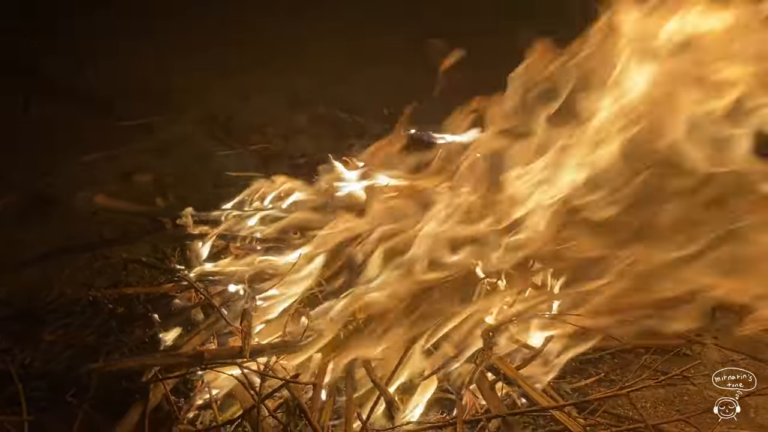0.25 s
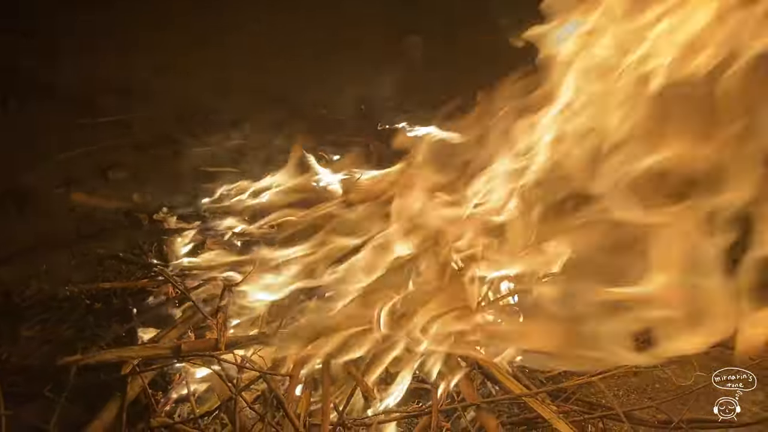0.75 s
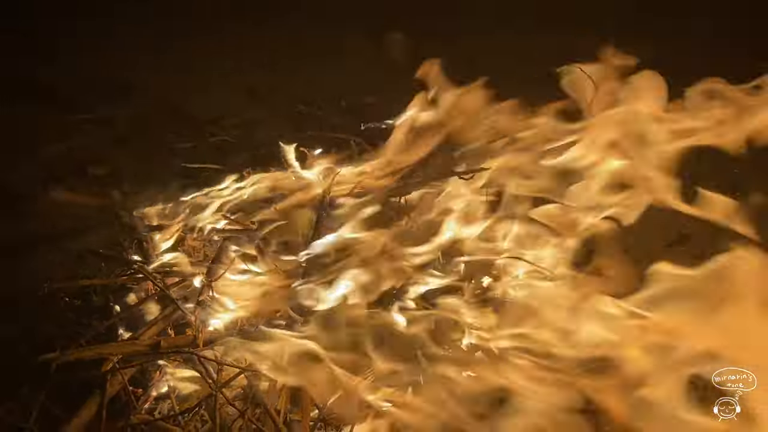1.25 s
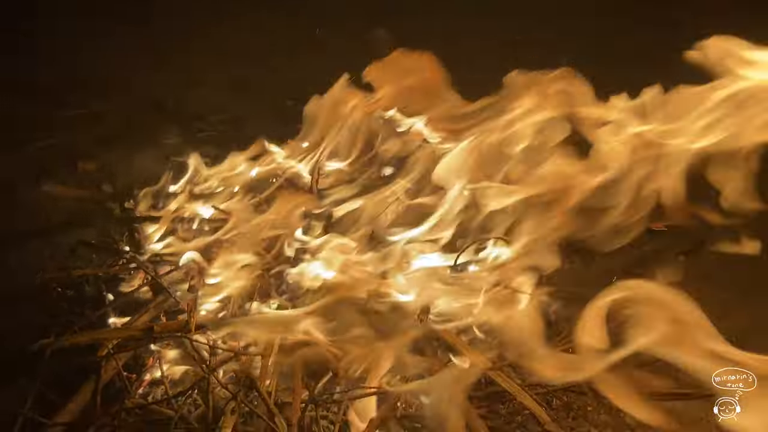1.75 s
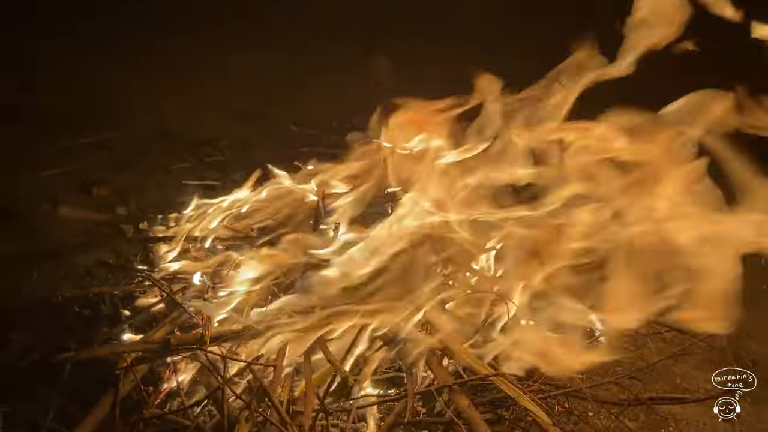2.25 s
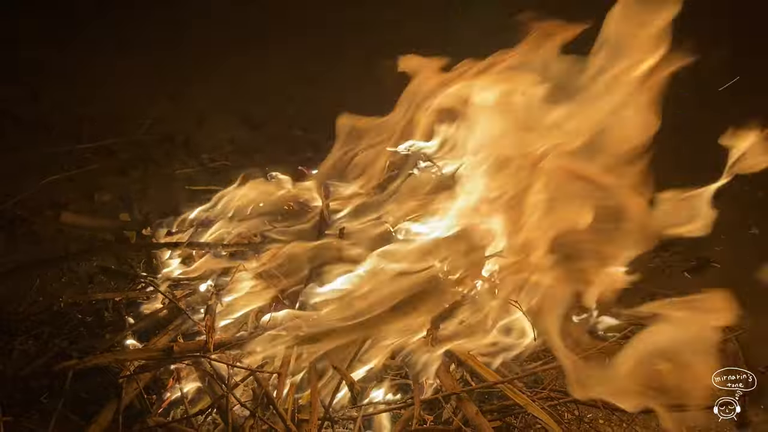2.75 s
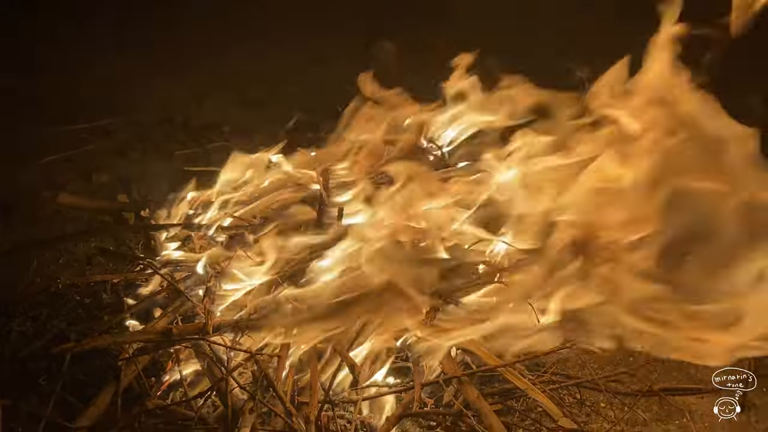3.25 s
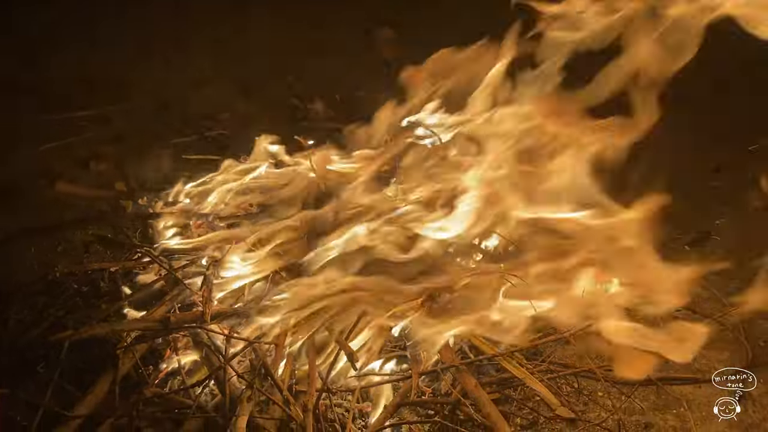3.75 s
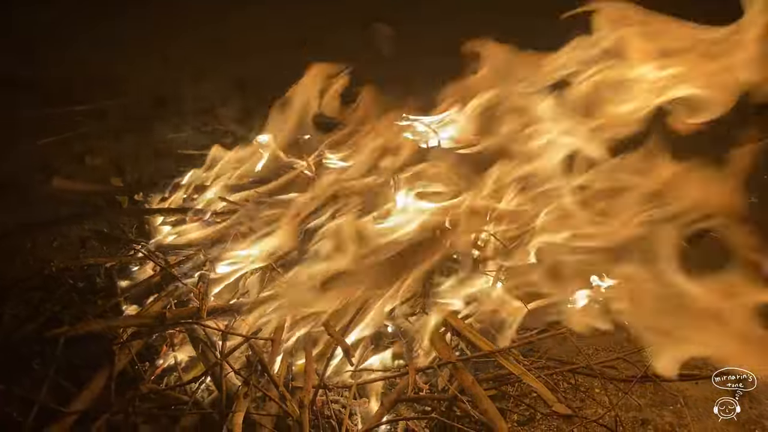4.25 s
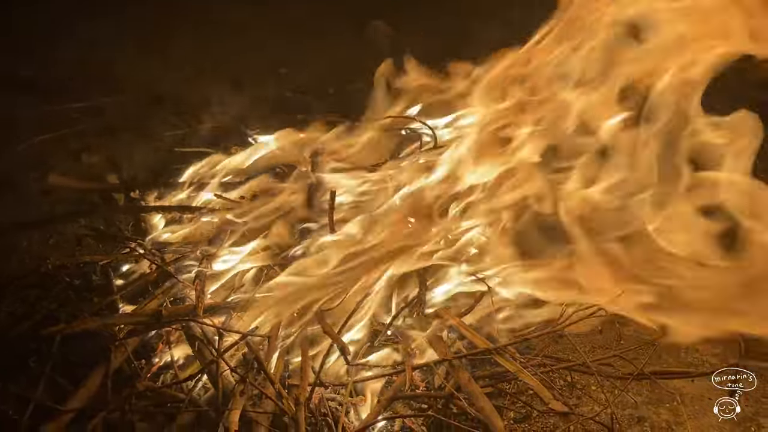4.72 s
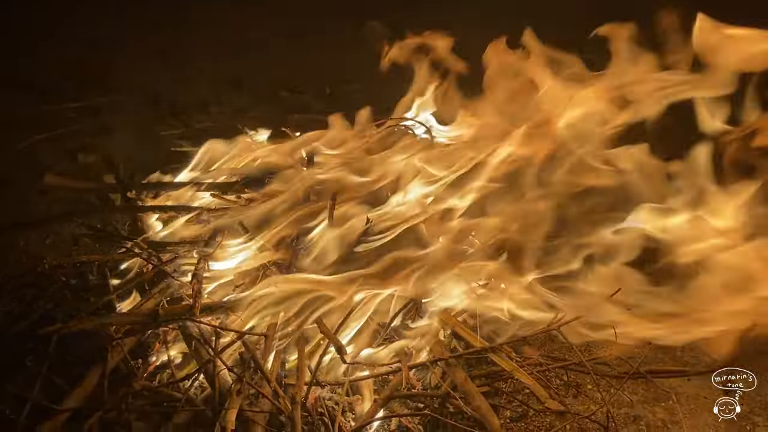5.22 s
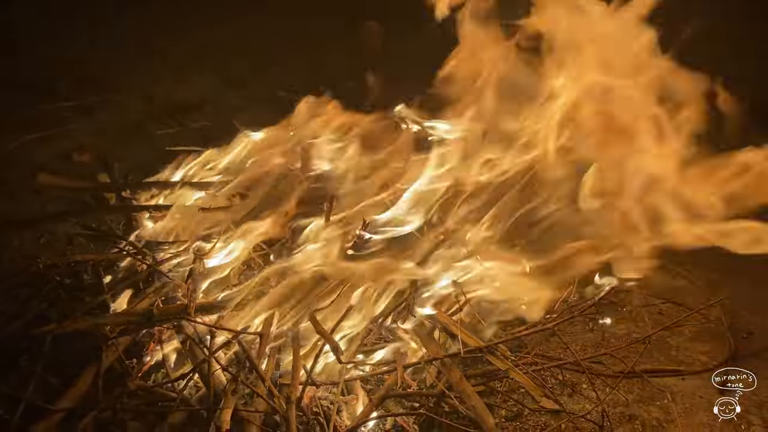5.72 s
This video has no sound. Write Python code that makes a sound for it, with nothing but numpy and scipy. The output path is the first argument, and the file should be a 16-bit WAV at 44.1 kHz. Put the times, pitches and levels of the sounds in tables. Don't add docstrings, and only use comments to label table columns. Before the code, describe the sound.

A heap of burning twigs, heard from a few metres away in open air. Crisp dry snaps crowd the first three seconds, the hardest at 0.3 and 1.8; a big pop at 3.7 blows out a short puff of gas. Wind flutters the flames in deep soft thuds, strongest just after 5 seconds, over steady airy hiss with wide treble.

```python
import sys
import numpy as np
from scipy import signal
from scipy.fft import rfft, irfft
from scipy.io import wavfile
from scipy.ndimage import uniform_filter1d

SR = 44100
rng = np.random.default_rng(int(sys.argv[2]) if len(sys.argv) > 2 else 0)


def amplitude_ratio(level_db):
    exponent = np.asarray(level_db, float) / 20
    return 10 ** exponent


def bounce(signal):
    frames = np.transpose(np.atleast_2d(signal))
    limited = np.clip(frames, -1, 1)
    pcm = np.round(limited * 32767).astype(np.int16)
    wavfile.write(sys.argv[1], SR, pcm)


N = 263718

# (frequency [Hz], level per Hz [dB])
FLAP_COLOUR = [(22, -19), (35, -17), (48, -4), (66, -3), (90, -6), (130, -15.5)]
ROAR_COLOUR = [(60, 1.5), (100, 0), (200, 0), (330, -4.5), (450, -14.5), (600, -26), (900, -27.5)]
DRONE_COLOUR = [(350, -11.5), (600, -7.5), (820, -3), (960, 0), (1150, -5.5), (1400, -8.5), (2200, -26.5)]
RUSH_COLOUR = [(400, -7), (800, 2), (1400, -4), (2200, -1), (3200, -3.5), (4500, -5.5), (6000, -3),
               (7500, -17)]
HISS_COLOUR = [(1500, -26), (3000, -9), (5000, -32), (6500, -3), (8500, 2.5), (12000, 3.5), (15800, 0),
               (16300, -49)]

# (time [s], peak level [dB], half length [s])
GUSTS = [(.36, -49.5, 0.16), (.75, -48.5, .09), (.99, -44.5, 0.049), (1.4, -45.5, 0.09), (1.7, -47, 0.075),
         (1.9, -48, .12), (2.11, -41.5, 0.05), (2.35, -47.5, 0.12), (2.65, -47, 0.16), (3.3, -55.5, .15),
         (3.53, -45, .035), (3.71, -43, 0.057), (3.83, -43, 0.042), (4.12, -53, 0.081), (4.38, -52, .06),
         (4.6, -46, 0.052), (4.77, -43, 0.048), (5.19, -38, 0.074), (5.35, -37.5, 0.021), (5.5, -45, 0.088),
         (5.63, -40.5, 0.032), (5.77, -50, 0.048), (5.92, -52.5, .1)]
CALM_DB = -56.5
# (time [s], level against the mean [dB])
DRAUGHT = [(0, -1.5), (.4, 1.5), (.53, -5.5), (.8, 2), (1.05, -2.5), (1.22, 4.5), (1.46, 0.5), (1.55, 4.5),
           (1.75, 1.5), (2.2, 1), (3.0, 0.5), (3.45, -1.5), (3.7, 1), (3.95, -2.5), (4.13, -1), (4.25, -2),
           (4.65, -1.5), (5.98, 0)]
ROAR_DB, HISS_DB = -47, -58
HISS_PER_DRAUGHT = 0.23

TYRES_S, TYRES_DB, RECEDE_S = 0.13, -59.5, 1.4
# (time [s], peak level [dB], half length [s])
SETTLES = [
    (1.72, -58.5, 0.14),
    (2.05, -63, .12),
    (.53, -58, 0.043),
    (2.16, -55.5, 0.043),
    (3.66, -62, 0.034),
    (4.55, -66.5, 0.13),
    (5.15, -68, 0.062),
    (5.8, -66, 0.52),
]

# (time [s], snap peak [dB], woody knock against snap [dB],
# crack against snap [dB], burst length [ms])
POPS = [(0.0307, -21.5, -36, -24, 0.37), (0.1702, -15.5, -13, -17, 0.17), (0.3431, -2, -17.5, -25, 0.39),
        (0.6703, -11.5, -16.5, -11, 1.4), (1.7108, -27, -34, -19, 0.48), (1.734, -24.5, -33, -23.5, 0.67),
        (1.7452, -28, -4, -1, 2.5), (1.7783, -0.5, -25, -17, 0.17), (1.7861, -22, -39, -13, 0.66),
        (1.875, -20, -13.5, -8.5, 0.54), (2.048, -19.5, -26, -27, 0.28), (2.5708, -27, -8, -2.5, 0.36),
        (2.6071, -20, -35, -26, 1.3), (2.6774, -18.5, -32, -23, 0.49), (2.7261, -10, -39, -17, 0.97),
        (3.549, -18, -29, -13.5, 0.38), (3.6677, -4, -10, -6, 1.47), (3.7886, -29, -41, -5.5, 2.1),
        (4.058, -27, -25, -4.5, 0.86), (4.725, -23, -23, -14, 0.37), (5.2514, -18, -19.5, -15, 0.31),
        (5.6483, -24, -16, -28, 0.38), (5.8987, -23, -18, -9.5, 0.8)]
# (time [s], level [dB])
JETS = [(.0306, -53), (.6705, -41), (1.7111, -46), (1.7787, -42.5), (2.048, -48), (2.6069, -47),
        (2.6773, -48), (3.5491, -57), (3.6674, -34), (5.2515, -49), (5.8985, -57)]
# (time [s], peak level [dB], burst length [ms])
SNAPS = [(.126, -29.5, .41), (.228, -28.5, .51), (.2522, -28, 0.45), (.33, -31, 0.95), (.4318, -34.5, 1.3),
         (.4688, -35, 0.92), (.5013, -34, 1.1), (.5287, -31, 0.54), (.7346, -28, .37), (1.2088, -38, 1.7),
         (1.2836, -35, 1.4), (1.3568, -31, .8), (1.4536, -34, 0.76), (1.5997, -28.5, .31),
         (1.848, -28.5, 1.3), (1.8819, -27, 0.81), (2.1992, -37, 0.43), (2.6349, -27.5, 0.54),
         (2.9552, -34, 2.9), (3.1529, -26.5, 0.59), (3.612, -31, .53), (3.95, -31, .33),
         (4.1072, -26.5, .3), (4.2757, -33, .9), (4.349, -30, .54), (5.5504, -34, .44), (5.7902, -24, 0.35),
         (5.864, -33, .44), (5.9708, -24, 0.41)]
# (time [s], peak level [dB])
FAINT_SNAPS = [(.061, -34), (.1782, -35), (.2053, -37), (.5475, -32), (.8186, -35), (.8412, -33), (1.1122, -38),
               (1.1476, -40), (1.2325, -36), (1.4295, -37), (1.5475, -34), (1.9201, -33), (1.979, -42),
               (2.167, -38), (2.5562, -38), (3.7495, -36), (3.8577, -37), (3.926, -39.5), (4.0705, -33),
               (4.0807, -37), (4.4984, -39), (4.6846, -39), (5.3344, -39.5), (5.3718, -38), (5.5611, -37),
               (5.6096, -36), (5.6311, -39), (5.8347, -37), (5.9567, -40)]
FAINT_SNAP_MS = 0.6
# (time [s], peak level [dB], burst length [ms])
CRACKS = [(.7125, -27, 1.1), (1.5042, -31, .55), (1.914, -25.5, 0.53), (2.0172, -30.5, 2.3),
          (2.2931, -29.5, 0.41), (2.5365, -33.5, 1.6), (2.8848, -29, 1.9), (3.2801, -37.5, 1.6),
          (3.4218, -34.5, 0.7), (4.1346, -31, .71), (4.1682, -32.5, 2), (4.5334, -26.5, 0.69),
          (4.5914, -34, .55), (4.8214, -28.5, 1.9), (4.9795, -33, .51), (4.9832, -29, .53),
          (5.35, -34, .71), (5.4529, -28.5, 0.33), (5.7959, -30, 0.44)]
# (time [s], peak level [dB], burst length [ms])
THUDS = [(.2573, -41, .41), (.4809, -32, 0.4), (1.6667, -33.5, 1.6), (2.1904, -27.5, 0.44),
         (2.1947, -25.5, 0.68), (2.3147, -33, 1.8), (2.6483, -34.5, .64), (2.6806, -33.5, 1.8),
         (2.8767, -32, 0.5), (3.6248, -32.5, .66), (4.7798, -38, 1.7), (4.8534, -40.5, 2.1),
         (5.265, -38, 2.1), (5.9765, -33, .38)]
SNAP_KNOCK_DB, SNAP_CRACK_DB = -37, -22
CRACK_KNOCK_DB, CRACK_CRACK_DB = -23, -13
THUD_KNOCK_DB, THUD_CRACK_DB = -9, -8

# (start [s], end [s], pitch [Hz], level [dB])
WHISTLES = [
    (.36, .5, 2945, -75),
    (.83, 1.04, 2945, -73),
    (1.06, 1.2, 2945, -81),
    (.36, .52, 5389, -78),
    (.83, .9, 5389, -77),
    (1.36, 1.56, 5389, -74),
    (1.56, 1.85, 5389, -77),
    (1.88, 1.97, 1640, -70),
    (2.11, 2.19, 1580, -67),
]
# (time [s], peak level [dB], ring [Hz], ring length [cycles])
KNOCKS = [
    (1.667, -47, 1070, 2.0),
    (1.715, -55, 891.4, 2.0),
    (2.133, -39, 1630, 2.8),
    (2.156, -48, 1013, 2.0),
    (2.172, -40, 1054, 1.4),
    (2.191, -32.5, 1020, 2),
    (5.038, -34, 1107, 1.431),
    (5.154, -34, 1103, 1.4),
]

# (frequency [Hz], phase lead [rad])
LEFT_LEAD = [(0, 0), (800, -.3), (1900, .4), (2800, 2.7), (3600, 3.8), (4500, 6.6), (5400, 8.9),
             (6600, 6.5), (17000, -7.6), (22050, -14.4)]


def level(x, db=0):
    return x * amplitude_ratio(db) / np.sqrt(np.mean(x ** 2, axis=-1, keepdims=True))


def band(x, lo_hz, hi_hz):
    sos = signal.butter(2, [lo_hz, min(hi_hz, 0.45 * SR)], "band", fs=SR, output="sos")
    y = signal.sosfilt(np.vstack([sos, sos]), x)
    return y / np.abs(y).max(axis=-1, keepdims=True)


def walk(rate):
    hold = int(SR / rate)
    steps = np.repeat(rng.standard_normal(N // hold + 1), hold)
    smooth = uniform_filter1d(uniform_filter1d(steps, hold), hold)
    return 1.06 * smooth[:N]


def pair(shape, alike):
    mid, side = rng.standard_normal((2,) + shape)
    alike = np.clip(alike, 0, 1)
    shared = mid * np.sqrt(1 + alike)
    apart = side * np.sqrt(1 - alike)
    return np.array([shared + apart, shared - apart])


def turbulence(colour, alike, flicker_db, rate, grain=1):
    hz = np.fft.rfftfreq(N, 1 / SR) + 1
    f, db = np.transpose(colour)
    colour_db = np.interp(np.log(hz), np.log(f), db, left=-90, right=-90)
    spectrum = rfft(pair((N,), alike) * grain) * amplitude_ratio(colour_db)
    out = 0
    for octave in np.arange(np.log2(f[0]), np.log2(f[-1]) + 0.5, 0.5):
        share = np.clip(1 - 2 * np.abs(np.log2(hz) - octave), 0, 1)
        out = out + irfft(spectrum * share, N) * amplitude_ratio(flicker_db * walk(rate))
    return level(out)


def steady(x, span_s):
    return x / np.sqrt(uniform_filter1d((x ** 2).mean(axis=0), int(span_s * SR)))


def swells(rows):
    t = np.arange(N) / SR
    return sum(amplitude_ratio(db) ** 2 * np.exp(-((t - s) / half) ** 2) for s, db, half in rows)


def add(out, times, sounds):
    for s, sound in zip(times, np.swapaxes(sounds, 0, 1)):
        i = int(s * SR)
        out[:, i:i + sound.shape[1]] += sound[:, :N - i]


def flame_flap():
    flap_db = 10 * np.log10(amplitude_ratio(CALM_DB) ** 2 + swells(GUSTS))
    noise = turbulence(FLAP_COLOUR, alike=0.83, flicker_db=5.5, rate=5.88)
    return amplitude_ratio(flap_db) * steady(noise, span_s=0.085)


def flame_roar(draught_db):
    roar_db = ROAR_DB + draught_db + 1.2 * walk(12) + 2.2 * walk(30)
    noise = turbulence(ROAR_COLOUR, alike=0.98812, flicker_db=2.0, rate=14)
    return amplitude_ratio(roar_db) * steady(noise, span_s=0.065)


def drone_and_rustle(drone_db):
    return amplitude_ratio(drone_db + 2.5) * turbulence(DRONE_COLOUR, alike=0.2, flicker_db=3.0, rate=8.2)


def sap_hiss(draught_db, drone_db):
    hiss_db = HISS_DB + HISS_PER_DRAUGHT * draught_db + 0.9 * walk(21)
    crackles = (rng.random(N) < 250 / SR) * amplitude_ratio(2.92 * rng.exponential(size=N))
    grain = 1 + 0.5 * signal.lfilter([1], [1, -np.exp(-1 / (0.00079 * SR))], crackles)
    rush_db = 0.28 * (drone_db + 67.5) + 0.5 * (hiss_db + 60) - 63.5
    rush = amplitude_ratio(rush_db) * turbulence(RUSH_COLOUR, alike=0.2, flicker_db=0.7, rate=25, grain=grain)
    hiss = amplitude_ratio(hiss_db + 2.5) * turbulence(HISS_COLOUR, alike=0.95, flicker_db=0.9, rate=35, grain=grain)
    return rush + hiss


def flames():
    t = np.arange(N) / SR
    draught_db = np.interp(t, *np.transpose(DRAUGHT))
    tyre_power = amplitude_ratio(TYRES_DB) ** 2 / (1 + ((t - TYRES_S) / RECEDE_S) ** 2)
    drone_db = 10 * np.log10(tyre_power + swells(SETTLES))
    fire = flame_flap() + flame_roar(draught_db)
    return fire + drone_and_rustle(drone_db) + sap_hiss(draught_db, drone_db)


def bursts(rows):
    snap_db, knock_db, crack_db, length_ms = rows.T[:, :, None]
    t = np.arange(600) / SR
    rasp = np.exp(-t / (np.maximum(length_ms, 0.1) * 0.00073))
    ground = amplitude_ratio(-25) * np.exp(-np.abs(t - 0.0016) / 0.00014)
    scatter = amplitude_ratio(-32.5) * np.exp(-t / 0.0022)
    echo = ground + scatter
    click = 2.3 * (t == 0)

    def push(alike):
        return pair(rasp.shape, alike) * (rasp + echo) + click

    snap = band(push(1.0), 7050, 15560)
    crack = band(push(0.13), 1670, 8030)
    knock = np.roll(band(push(0.64), 754, 2720), int(0.00033 * SR), axis=-1)
    thump = band(push(0.92), 146, 737)
    wood = knock + amplitude_ratio(-16.5) * thump
    return amplitude_ratio(snap_db) * (snap + amplitude_ratio(crack_db) * crack + amplitude_ratio(knock_db) * wood)


def pops(out):
    rows = np.array(POPS)
    add(out, rows[:, 0], bursts(rows[:, 1:]))


def gas_jets(out):
    rows = np.array(JETS)
    t = np.arange(5000) / SR
    shape = np.minimum(t / 0.0041, 1) * np.exp(-t / 0.039)
    jet = band(pair((len(rows), len(t)), 0.19), 840, 13700) * shape
    add(out, rows[:, 0], amplitude_ratio(rows[:, 1:] + 5.5) * jet)


def small_ticks(out):
    faint_snaps = [(s, db, FAINT_SNAP_MS) for s, db in FAINT_SNAPS]
    kinds = [([*SNAPS, *faint_snaps], SNAP_KNOCK_DB, SNAP_CRACK_DB),
             (CRACKS, CRACK_KNOCK_DB, CRACK_CRACK_DB),
             (THUDS, THUD_KNOCK_DB, THUD_CRACK_DB)]
    for rows, knock_db, crack_db in kinds:
        s, db, ms = np.transpose(rows)
        add(out, s, bursts(np.transpose([db, knock_db + 0 * s, crack_db + 0 * s, ms])))


def faint_ticks(out):
    when, size, wood, bright, long = rng.random((110, 5)).T
    faint_db = np.minimum(-48 - 2.2 * np.log(size), -36)
    knock_db, crack_db = -30 + 12 * wood, -28 + 16 * bright
    length_ms = 0.24 + 1.6 * long ** 2
    add(out, when * N / SR, bursts(np.transpose([faint_db, knock_db, crack_db, length_ms])))


def whistles():
    t = np.arange(N) / SR
    out = 0
    for start, end, hz, db in WHISTLES:
        fade = np.clip(np.minimum(t - start, end - t) / 0.04, 0, 1)
        loudness = fade * amplitude_ratio(db + 6 + 3.5 * walk(30))
        sides = np.array([[np.sign(2500 - hz)], [1]])
        out = out + loudness * np.sin(2 * np.pi * hz * t) * sides
    return out


def knocks(out):
    s, db, hz, cycles = np.array(KNOCKS).T[:, :, None]
    delay_s = np.array([0.00022, 0])[:, None, None]
    turns = hz * np.maximum(np.arange(1500) / SR - delay_s, 0)
    fade = np.exp(-np.maximum(turns - 1, 0) / np.maximum(cycles, 0.3))
    ring = np.sin(2 * np.pi * turns) * np.minimum(turns, 1) * fade
    add(out, s[:, 0], amplitude_ratio(db) * ring)


def scene():
    out = flames() + whistles()
    pops(out)
    gas_jets(out)
    small_ticks(out)
    faint_ticks(out)
    knocks(out)
    return out


def band_limit(x):
    return signal.sosfilt(signal.butter(12, 17140, fs=SR, output="sos"), x)


def record(dry):
    hz = np.fft.rfftfreq(N, 1 / SR)
    turn = np.interp(hz, *np.transpose(LEFT_LEAD))
    phase = np.exp(1j * np.array([turn, 0 * turn]))
    wide = irfft(rfft(dry) * phase * (hz < 16900), N)
    mix = 0.9 * np.tanh(wide / 0.9)
    return band_limit(mix)


dry = scene()
out = record(dry)
bounce(out)
```